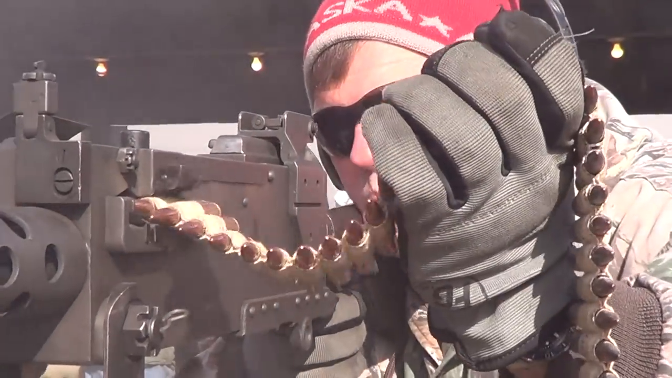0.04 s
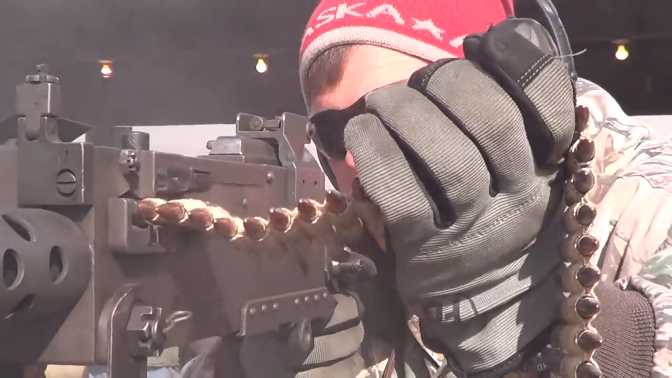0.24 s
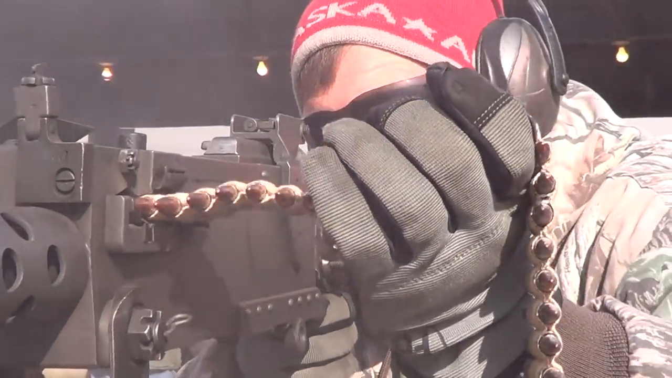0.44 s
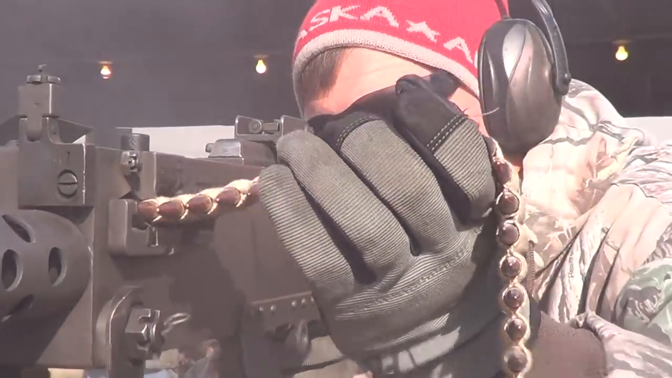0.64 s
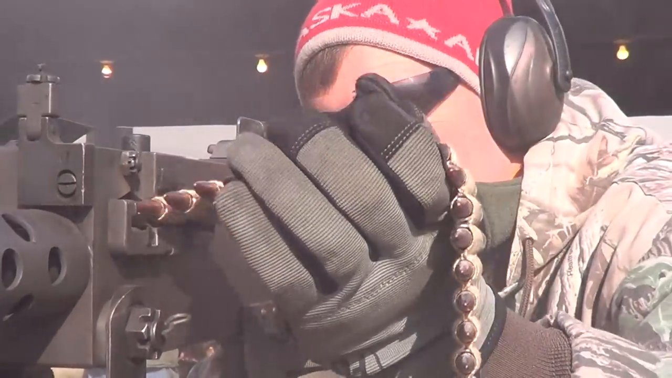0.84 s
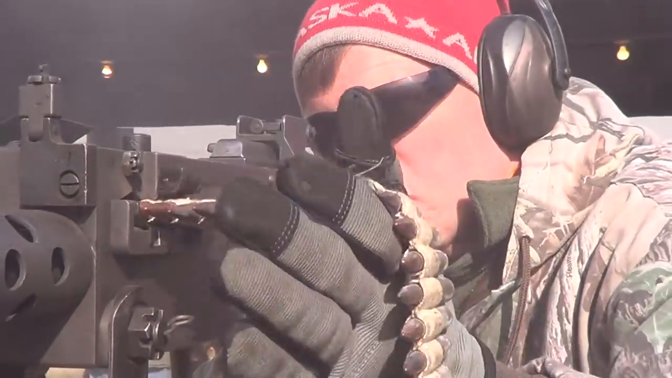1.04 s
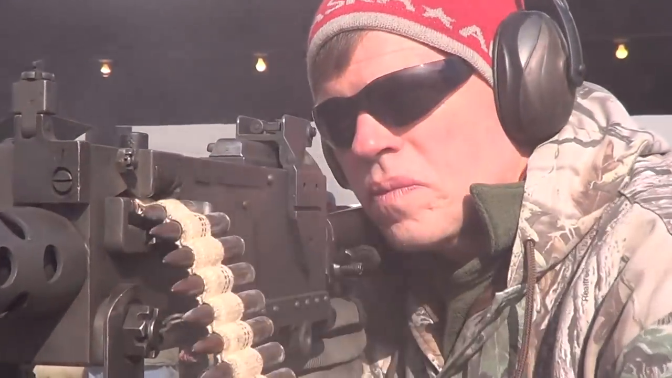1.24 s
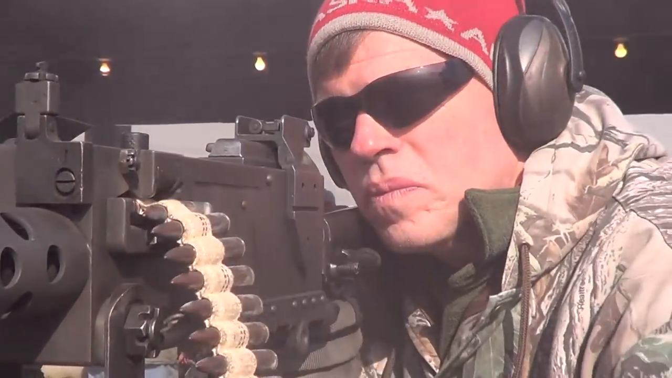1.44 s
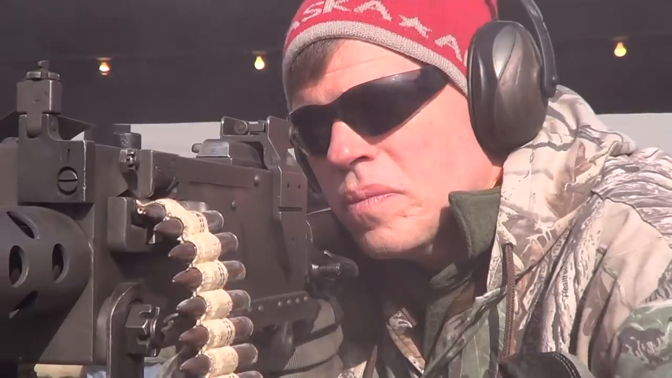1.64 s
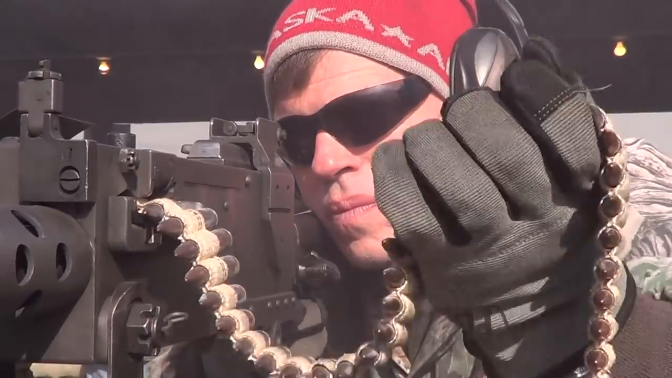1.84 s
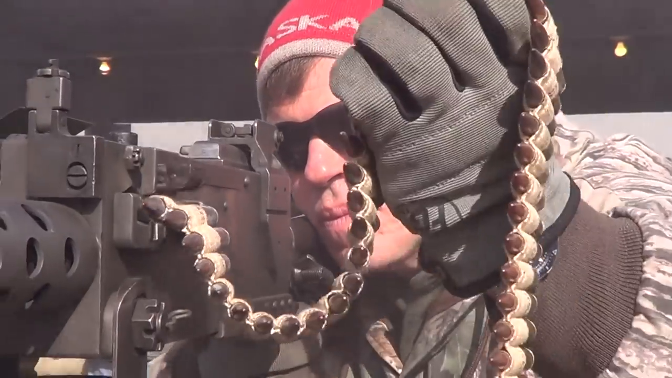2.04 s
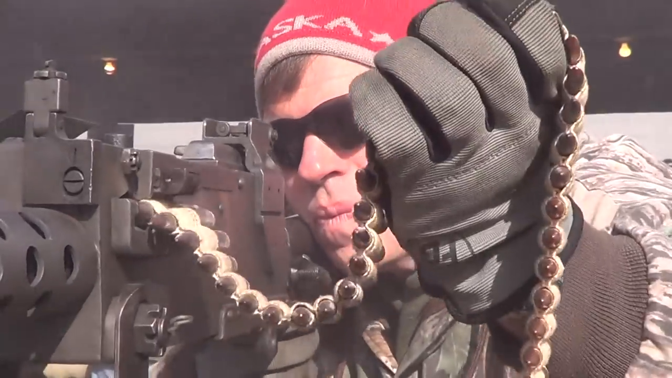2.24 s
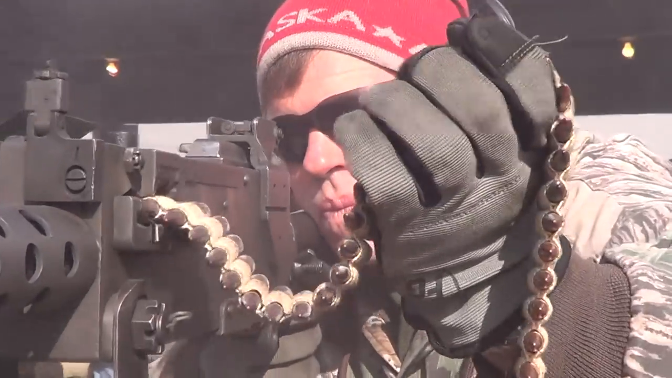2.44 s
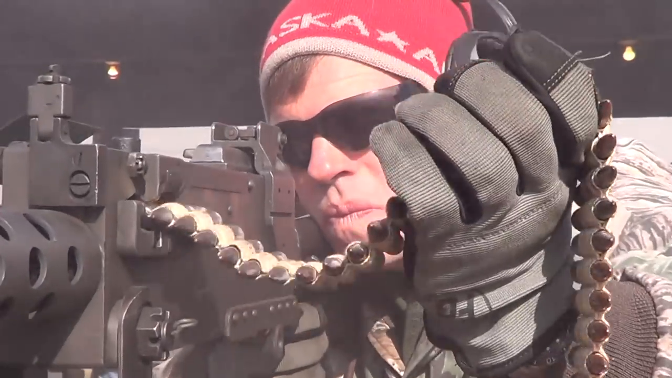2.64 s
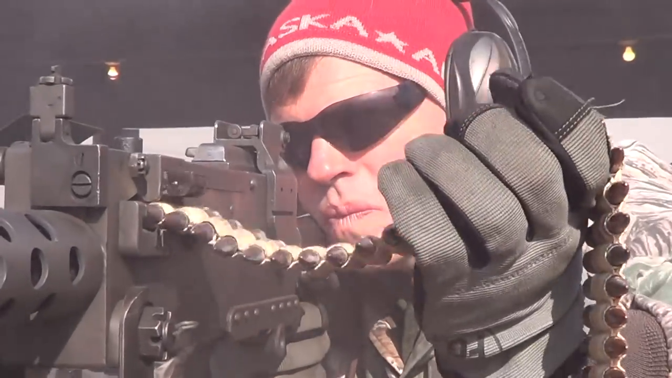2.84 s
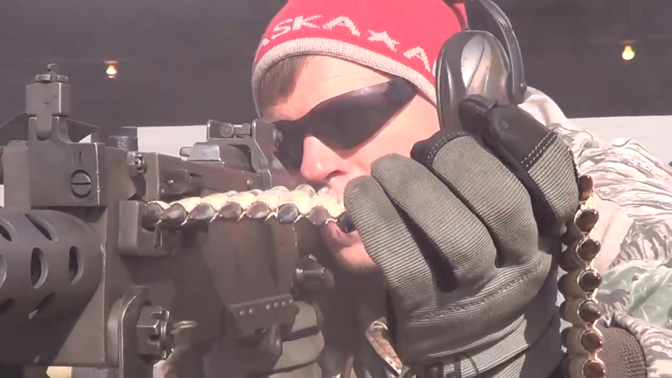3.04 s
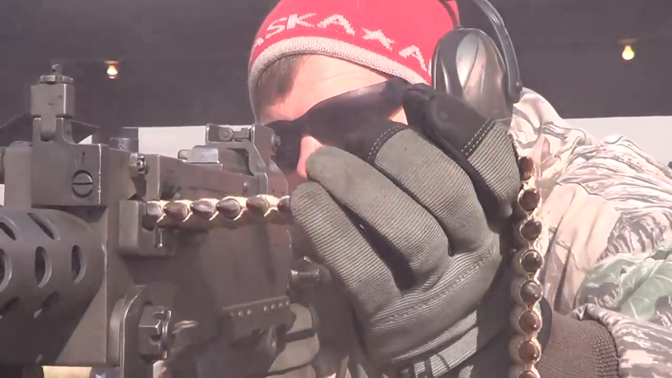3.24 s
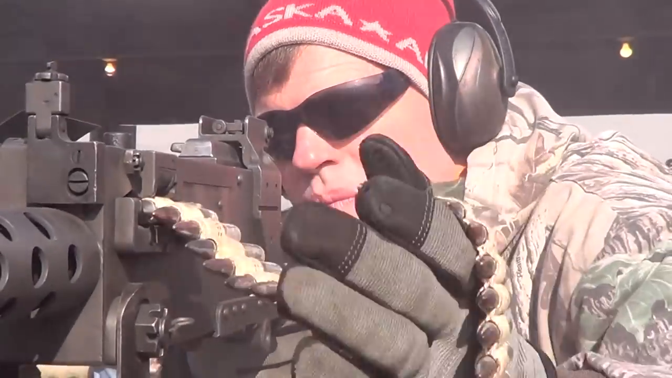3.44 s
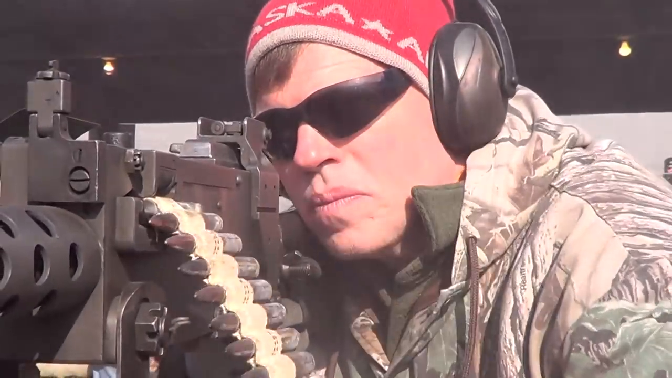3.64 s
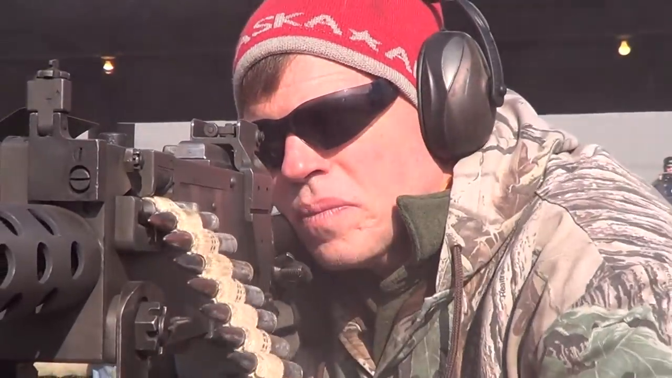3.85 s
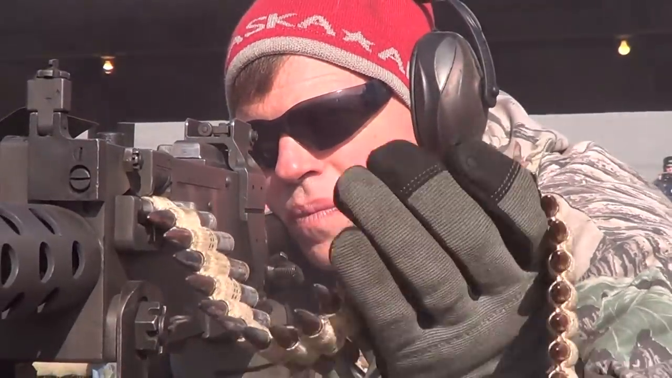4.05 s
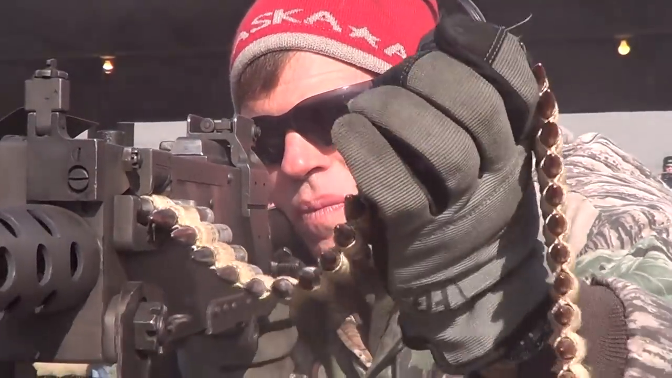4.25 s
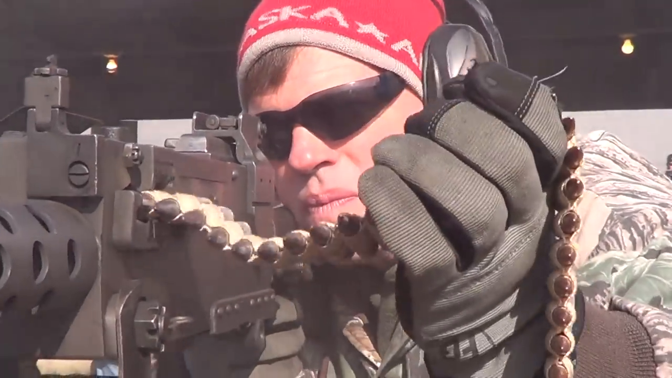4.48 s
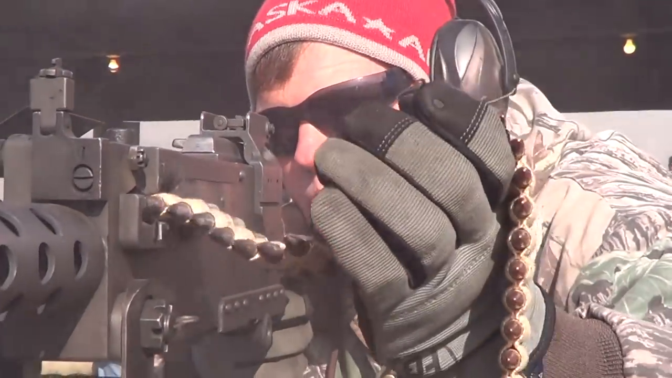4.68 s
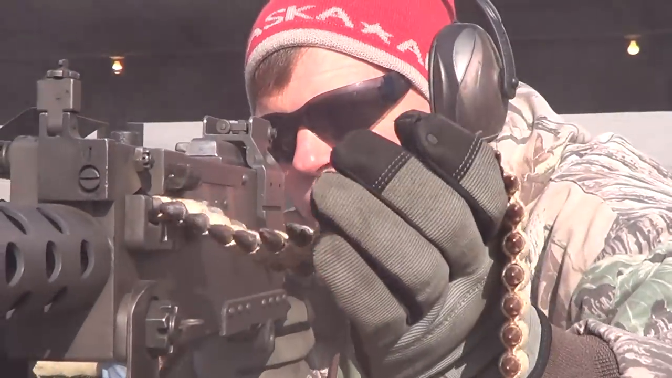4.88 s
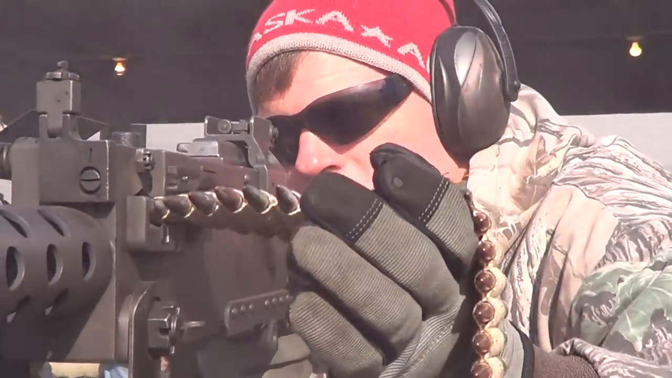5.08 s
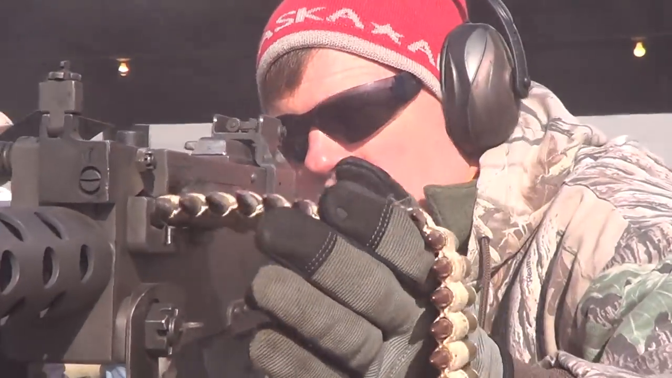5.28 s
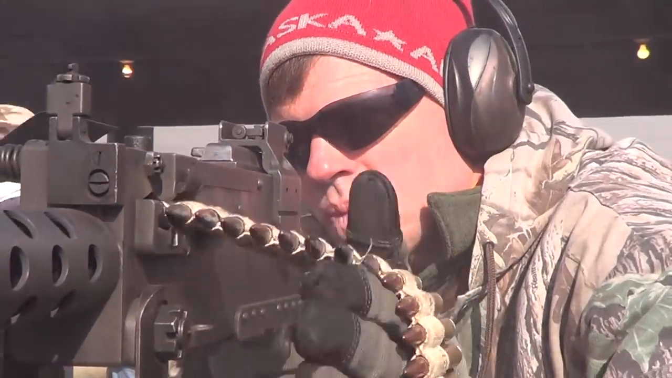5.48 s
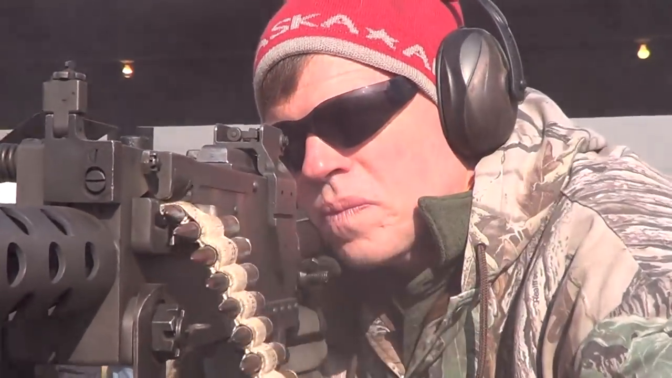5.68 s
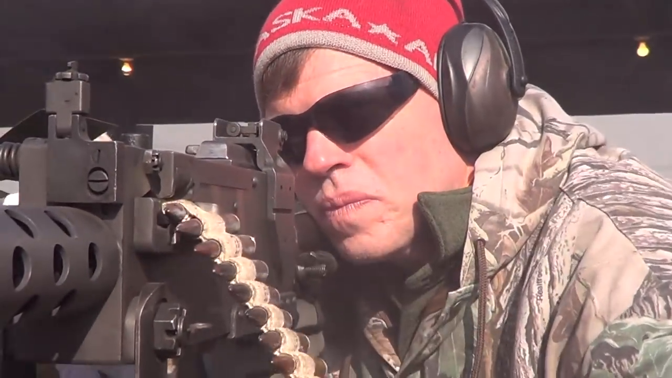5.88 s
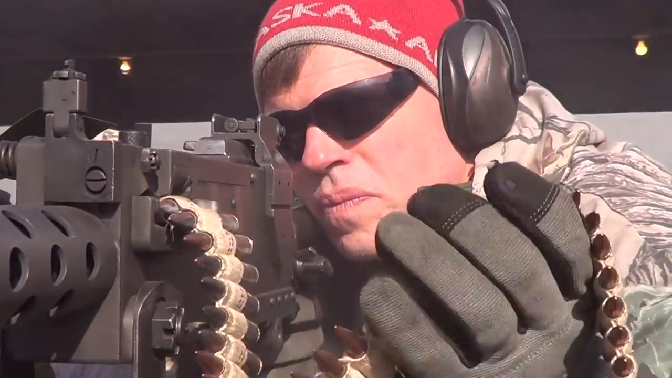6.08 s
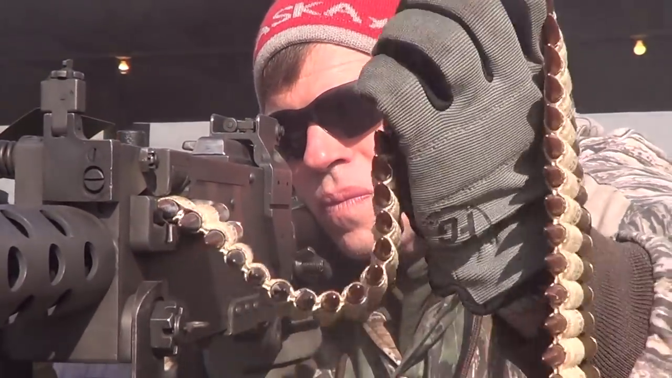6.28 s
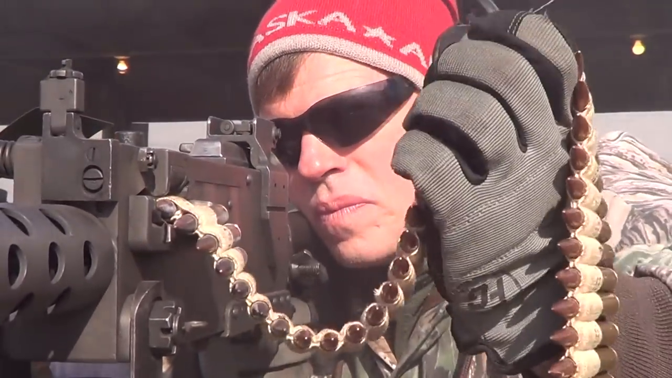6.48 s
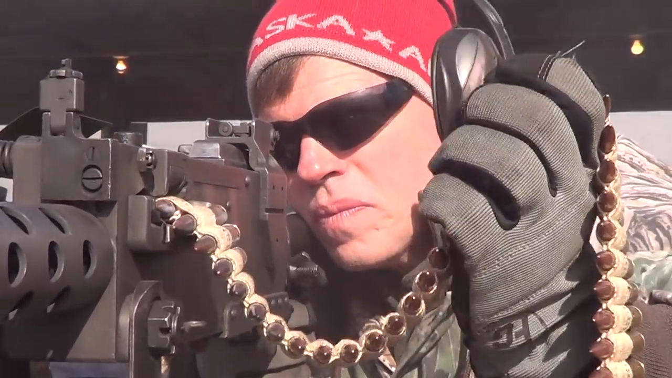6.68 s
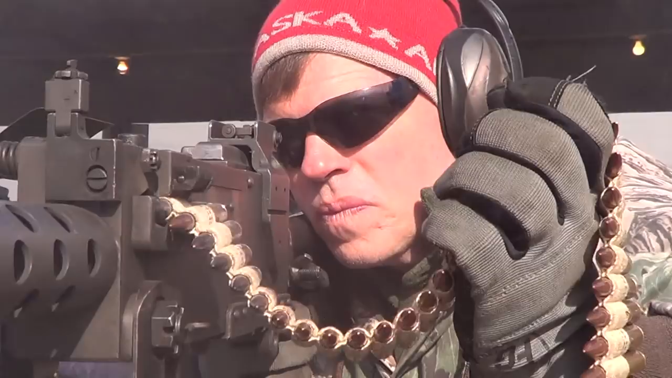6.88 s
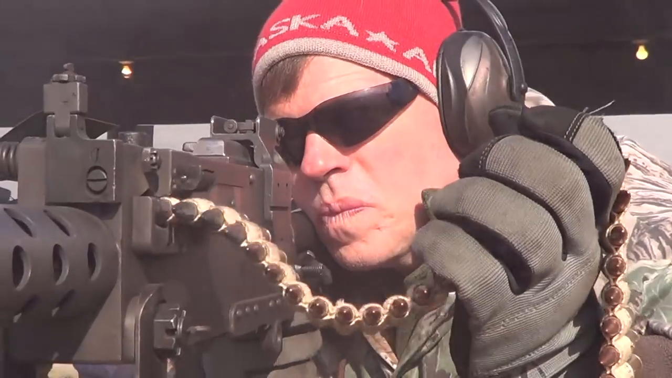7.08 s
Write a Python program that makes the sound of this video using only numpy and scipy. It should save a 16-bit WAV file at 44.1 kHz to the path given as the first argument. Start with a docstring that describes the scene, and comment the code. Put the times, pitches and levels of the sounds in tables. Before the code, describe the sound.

A belt-fed machine gun, already firing, pounds right beside a small microphone under an open shelter at an outdoor range. Three long bursts of about nine rounds per second each end in a bolt clack; a fourth is just starting at the end. In the gaps the echo rolls away, spent brass tinkles, the cartridge belt rattles and slides, and one deeper gun booms in the first gap. Faint distant firing continues.

```python
"""Machine-gun fire is already under way under the roof of an outdoor range: four bursts beside the microphone.
Each blast is a pressure pulse plus noise bands swelling off the shelter; chattering noise and freely ringing
steel modes make the bolt. Between bursts the range echo rolls on in decaying noise bands, the belt rattles
and slides, brass cases ring in damped sines, and a heavier gun booms once. Far shots pop over a steady din."""
import sys
import numpy as np
from scipy import signal
from scipy.fft import rfft, irfft, next_fast_len
from scipy.io import wavfile
from scipy.ndimage import uniform_filter1d

SR = 44100
rng = np.random.default_rng(int(sys.argv[2]) if len(sys.argv) > 2 else 0)


def pcm_store(signal):
    """Save signal as 16-bit PCM."""
    levels = np.round(np.clip(np.atleast_2d(signal), -1, 1) * 32767)
    wavfile.write(sys.argv[1], SR, levels.astype(np.int16).T)


N = 313992


def amp(db):
    """dB to gain."""
    return 10 ** (np.asarray(db) / 20)


def unit(x):
    """Scale to rms 1."""
    return x / np.sqrt(np.mean(x ** 2) + 1e-20)


def clock(seconds):
    """Sample times from zero, in s."""
    return np.arange(int(seconds * SR)) / SR


def add(track, start_s, sound):
    """Mix a sound into the track at start_s; what lies outside the track is dropped."""
    start = round(start_s * SR)
    sound = sound[max(-start, 0):]
    part = track[max(start, 0):][:len(sound)]
    part += sound[:len(part)]


def along(points, hz):
    """Interpolate (Hz, value) points on a log-frequency axis."""
    point_hz, value = np.transpose(points)
    return np.interp(np.log(hz + 1), np.log(point_hz + 1), value)


def filtered(x, response):
    """Multiply the spectrum of x by a response of frequency."""
    n = x.shape[-1]
    padded = next_fast_len(n + 4096)
    spectrum = rfft(x, padded) * response(np.fft.rfftfreq(padded, 1 / SR))
    return irfft(spectrum, padded)[..., :n]


def low_cut(x, corner_hz):
    """Causal second-order high-pass."""
    sos = signal.butter(N=2, Wn=corner_hz, btype="high", fs=SR, output="sos")
    return signal.sosfilt(sos, x)


def resonances(modes, f):
    """One causal band-pass response per (centre_hz, width_hz, level_db) mode."""
    return np.array([amp(db) * 1j * f * width / (centre ** 2 - f ** 2 + 1j * f * width)
                     for centre, width, db in modes])


def hiss(spectrum):
    """Coloured noise of rms 1."""
    return unit(filtered(rng.standard_normal(N), lambda f: amp(along(spectrum, f))))


def smoothed_noise(shape, samples):
    """Slow random variation of rms 1: white noise under a moving average."""
    return unit(uniform_filter1d(rng.standard_normal(shape), size=samples))


def strike(t, rise, t60):
    """A contact's envelope: silent before zero, quick rise, exponential fall."""
    t = np.maximum(t, 0)
    return (1 - np.exp(-t / rise)) * amp(-60 * t / t60)


def bloom(noise, bands, start_db):
    """Scattered sound: each noise band swells from start_db below its level, then dies at its own speed."""
    n = noise.shape[-1]
    t, f = np.arange(n) / SR, np.fft.rfftfreq(n, 1 / SR)
    spectrum = rfft(noise)
    centres, out = np.array(bands)[:, 0], 0
    for (_, db, swell, t60), own in zip(bands, np.eye(len(bands))):
        level_db = db + np.where(t < swell, start_db * (1 - t / swell), -60 * (t - swell) / t60)
        band = irfft(spectrum * along(np.c_[centres, own], f), n)
        out = out + band * amp(level_db)
    return out * np.sqrt(SR / 2)  # white noise to level per Hz


# bursts: first_round_s, round_count, cycle_s, slowing_s_per_round
BURSTS = [(-0.0629, 12, .11052, .00002), (2.0541, 11, .11269, .00042), (4.3086, 12, .1124, .00066),
          (6.7686, 4, .11396, .0034)]
HEAD_START_S = .006  # first cycle of a burst is this much shorter
BLAST_DB, BLAST_SAG_DB = -0.12, 0.1249  # first round; loss per further round


def rounds():
    """Each round's time (s) and place in its burst; the cycle lengthens while the trigger is held."""
    times, places = [], []
    for start, count, cycle, slowing in BURSTS:
        k = np.arange(count)
        lengthening = slowing * k * (k - 1) / 2
        times.append(start + k * cycle + lengthening - HEAD_START_S * (k > 0))
        places.append(k)
    return np.concatenate(times), np.concatenate(places)


# distant din of the firing line: freq_hz, relative_db_per_hz
DIN_SPECTRUM = [(25, -30), (170, -4), (420, 1.5), (950, 1.5), (1800, -11), (4000, -17.5), (10000, -29),
                (16000, -36)]


def din():
    """The distant firing line is steady coloured noise."""
    return amp(-45.0) * hiss(DIN_SPECTRUM)


# shots from far lanes: start_s, level_db
FAR_SHOTS = [(1.098, -19.5), (1.538, -40), (1.573, -28), (1.657, -28.5)]
# a far shot's dull pop: freq_hz, relative_db_per_hz
POP_SPECTRUM = [(40, -27), (300, -18), (750, -7), (1600, 1), (3000, -10), (16000, -35)]


def far_lanes():
    """Other shooters' rounds arrive as dull pops: short bursts of coloured noise."""
    t, level = clock(.15), np.zeros(N)
    for start_s, db in FAR_SHOTS:
        add(level, start_s, amp(db) * strike(t, rise=0.0018, t60=0.052))
    return level * hiss(POP_SPECTRUM)


# range's long answer to one round: centre_hz, level_db_per_hz, swell_s, t60_s
RANGE_BANDS = [(30.14, -113, .1, 1.8), (170, -78, 0.145, 3.3), (440, -68, 0.065, 3.35),
               (950, -68.5, 0.081, 3), (2020, -72.5, 0.14, 2.95), (4500, -76.5, 0.046, 2.22),
               (9226, -79, 0.017, 1.5), (16014, -101, .05, 1.1)]


def range_echo():
    """Berms and trees return every round as a long roll; the rolls add in power."""
    slow_t = np.linspace(0, N / SR, num=1500)
    fired, place = rounds()
    shot_power = amp(BLAST_DB - BLAST_SAG_DB * place) ** 2
    padded = next_fast_len(N)
    t, f = np.arange(N) / SR, np.fft.rfftfreq(padded, 1 / SR)
    white = rfft(rng.standard_normal(padded))
    centres, out = np.array(RANGE_BANDS)[:, 0], 0
    for (_, db, swell, t60), own in zip(RANGE_BANDS, np.eye(len(RANGE_BANDS))):
        power = shot_power @ strike(slow_t - fired[:, None], swell / 2, t60) ** 2
        # uneven ground makes the roll lumpy
        lumps_db = 1.05 * smoothed_noise(len(slow_t), samples=6)
        band = irfft(white * along(np.c_[centres, own], f), padded)[:N]
        out = out + np.interp(t, slow_t, amp(db + lumps_db) * np.sqrt(power)) * band
    return out * np.sqrt(SR / 2)


# heavier gun's low boom under the roof: pitch_hz, level_db, t60_s
HEAVY_BOOM = [(62, -27, 0.04), (135, -20, .05), (348, -20, 0.18), (770, -20.5, 0.12)]
# heavier gun's report: centre_hz, level_db_per_hz, swell_s, t60_s
HEAVY_REPORT = [(30, -71, .003, .06), (80, -64, .004, 0.08), (150, -56.5, .005, 0.22),
                (350, -54, 0.013, 0.33), (820, -55, .006, 0.36), (1600, -62, 0.013, 0.35),
                (5000, -65.5, .004, 0.41), (16000, -78, .004, .2)]
# heavier gun's roll over the range: centre_hz, level_db_per_hz, swell_s, t60_s
HEAVY_ROLL = [(30, -91, .07, 1), (150, -74.5, .07, 3), (400, -65.5, .15, 2.4), (900, -70, 0.14, 3.8),
              (2000, -76.5, 0.28, 3), (5000, -82.5, 0.17, 2.1), (16000, -104, .1, .8)]


def heavy_gun():
    """One deep report from down the firing line: damped sines boom, noise bands crack and roll."""
    t, out = clock(0.73), np.zeros(N)
    boom = sum(amp(db) * strike(t, rise=0.0058, t60=t60) * np.sin(2 * np.pi * hz * t)
               for hz, db, t60 in HEAVY_BOOM)
    report = bloom(rng.standard_normal(len(t)), HEAVY_REPORT, start_db=-0.5)
    roll = bloom(rng.standard_normal(len(t)), HEAVY_ROLL, start_db=-13)
    add(out, 1.3835, boom + report + roll)
    return out


# modes of a brass case: pitch_hz, relative_db, t60_s
BRASS_MODES = [(7970, -2.5, 0.18), (8240, -3, 0.1), (10160, -1, 0.16), (10800, -9, 0.47), (11370, 4, 0.12),
               (11620, -7, 0.21), (11710, -19, .25), (15900, -12, .18), (15450, -14, .25)]


def chime(t, decays, tick_db, scatter):
    """A brass tube struck at a random spot: a tick and close mode pairs, a little different for each case."""
    hz, db, _ = np.transpose(BRASS_MODES)
    pitch_hz = hz * (1 + scatter * rng.standard_normal(len(hz)))
    gains = amp(db + rng.normal(0, 3.2, len(hz)))
    ring = gains @ (decays * np.sin(2 * np.pi * np.outer(pitch_hz, t)))
    tick = np.diff(rng.standard_normal(len(t) + 1)) * amp(-60 * t / .016)
    return ring + amp(tick_db) * tick


# spent cases that land hardest: start_s, relative_db
CASES = [(1.325, -25.5), (1.454, -25), (1.676, -29.5), (1.834, -24.5), (1.972, -32), (3.605, -27),
         (3.743, -27), (3.832, -24), (4.075, -32), (4.213, -40), (5.898, -31.5), (5.965, -27), (6.163, -32),
         (6.282, -26), (6.556, -32.5)]
# every round's case also tumbles softly: earliest and latest delay after firing, level and its scatter
TUMBLE_S, TUMBLE_DB, TUMBLE_SCATTER_DB = (.6, 1.15), -46, 2.5


def brass():
    """Cases land on the heap, ring and jostle their neighbours."""
    t, out = clock(.25), np.zeros(N)
    decays = np.array([amp(-60 * t / t60) for _, _, t60 in BRASS_MODES])
    for start_s, db in CASES:
        add(out, start_s, amp(db - 11.0) * chime(t, decays, tick_db=-6, scatter=.009))
        for delay_s in rng.uniform(0.0017, .04, size=2):
            neighbour = chime(t, decays, tick_db=-12, scatter=0.015)
            add(out, start_s + delay_s, amp(db - 20.0) * neighbour)
    for fired_s in rounds()[0]:
        db = TUMBLE_DB + TUMBLE_SCATTER_DB * rng.standard_normal()
        landing_s = fired_s + rng.uniform(*TUMBLE_S)
        add(out, landing_s, amp(db) * chime(t, decays, tick_db=-9, scatter=.012))
    return out


# modes of the steel receiver: centre_hz, width_hz, relative_db
RECEIVER_MODES = [(2150, 240, -2.5), (3412, 85, 3.5), (3780, 106, 4.5), (4200, 240, -1), (4990, 210, 5),
                  (6640, 230, 7), (7670, 300, 2), (8340, 340, 4), (9260, 160, 5), (9950, 310, 5.5),
                  (11200, 370, -7.5), (13950, 350, -9), (15700, 250, -8)]
# dry metal contact: freq_hz, relative_db_per_hz
CONTACT_SPECTRUM = [(25, -21), (200, -14), (600, -4.5), (2000, -10.5), (4000, -4.5), (9500, -1.5),
                    (12500, -10), (17000, -19)]


def steel(dry_db, grain_db):
    """Chattering contacts ring the receiver, mixed with dry contact noise; rms 1."""
    grain = amp(grain_db * smoothed_noise(N, samples=70))
    grid_hz = np.fft.rfftfreq(4096, 1 / SR)
    # neighbouring modes swing in opposite directions
    signs = (-1) ** np.arange(len(RECEIVER_MODES))
    body = abs(signs @ resonances(RECEIVER_MODES, grid_hz))
    ring = filtered(grain * rng.standard_normal(N), lambda f: np.interp(f, grid_hz, body))
    dry_contact = unit(grain * hiss(CONTACT_SPECTRUM))
    return unit(unit(ring) + amp(dry_db) * dry_contact)


# belt and feed tray rattles: start_s, relative_db, hollow_re_bright_db, t60_s
RATTLES = [(1.32, -20, 4.5, .045), (1.552, -22.5, -19, 0.054), (1.729, -22.5, -17, .086),
           (3.436, -27, 4.5, 0.05), (3.603, -27.5, -17, .07), (3.826, -35, -14, 0.05),
           (4.025, -20, -11.5, 0.13), (6.045, -34, -10, .058), (6.478, -30.5, -13, 0.039)]
# belt slides through the glove after each burst: start_s, length_s, level_db
SLIDES = [(1.55, .42, -51.5), (3.46, 0.55, -49.5), (5.917, 0.25, -43.5), (6.51, 0.3, -54)]
# hollow knock in the tray: freq_hz, relative_db_per_hz
TRAY_SPECTRUM = [(30, -22), (500, -8), (1600, 0), (3000, 3.5), (6000, -14), (17000, -38)]
LINK_CLICKS_PER_S, LINK_DB, LINK_T60_S = 22, 12, .035  # level over the sliding, before random force


def belt():
    """Cartridges knock against the feed tray and click against each other as the belt slides."""
    t = clock(.2)
    bright, hollow, sliding = np.zeros((3, N))
    for start_s, db, hollow_db, t60 in RATTLES:
        knock = amp(db - 2) * strike(t, rise=t60 / 50, t60=t60)
        add(bright, start_s, knock)
        add(hollow, start_s, amp(hollow_db) * knock)
    for start_s, length_s, db in SLIDES:
        add(sliding, start_s, amp(db) * np.sqrt(np.hanning(int(length_s * SR))))
        count = round(LINK_CLICKS_PER_S * length_s)
        click = amp(db + LINK_DB) * strike(t, rise=.0005, t60=LINK_T60_S)
        for k, (slip, force) in enumerate(rng.random((count, 2))):
            add(bright, start_s + length_s * (k + slip) / count, force * click)
    knocks = bright * steel(dry_db=9, grain_db=1.5) + hollow * hiss(TRAY_SPECTRUM)
    return knocks + sliding * steel(dry_db=11, grain_db=5)


# a clack's free ring: level re contact, scatter of each mode, share of the receiver's damping
RING_DB, RING_SCATTER_DB, RING_DAMPING = 0, 4.5, .5


def clack(t):
    """One hard steel contact: the receiver's modes ring freely, in a new balance each time."""
    hz, width_hz, db = np.transpose(RECEIVER_MODES)
    gains = amp(db + RING_SCATTER_DB * rng.standard_normal(len(hz)))
    pitch_hz = hz * rng.normal(1, 0.004, len(hz))
    phase = 2 * np.pi * (np.outer(pitch_hz, t) + rng.random((len(hz), 1)))
    decays = np.exp(-np.pi * RING_DAMPING * np.outer(width_hz, t))
    ring = gains @ (np.sin(phase) * decays)
    return ring / np.linalg.norm(gains) * (1 - np.exp(-t / .0005))


# bolt strikes the belt pawl, then locks: lead_before_round_s, relative_db
CLACKS = [(.0138, -15), (.005, -20)]
# bolt closes on a round that stays unfired: start_s, relative_db, length_s
STOPS = [(1.247, -11, 0.023), (3.294, -10.5, 0.02), (5.686, -15, .026)]
# bolt hits its buffer, more softly as the gun slows: delay after blast, mean first level, loss per round
BUFFER_S, BUFFER_DB, BUFFER_SAG_DB = .038, -13.5, 2
# bolt runs forward: lead before the round, level, loss per round
FEED_LEAD_S, FEED_DB, FEED_SAG_DB = 0.032, -0.5, 0.41


def action():
    """The bolt hits its buffer after each blast, then scrapes forward, pulls the belt and locks."""
    t = clock(.15)
    back, forward, ring = np.zeros((3, N))
    # the scrape gathers as the bolt picks up speed
    run_up = (1 - np.exp(-(t / 0.021) ** 3.27)) * amp(-60 * t / 0.079)
    fired, place = rounds()
    contacts = []
    for fired_s, k, (hit, pull, drag) in zip(fired, place, rng.standard_normal((len(fired), 3))):
        hit_db = BUFFER_DB - BUFFER_SAG_DB * k + 2.3 * hit
        add(back, fired_s + BUFFER_S, amp(hit_db) * strike(t, rise=0.0065, t60=0.075))
        if k > 0:
            force_db = .7 * pull - FEED_SAG_DB * k
            add(forward, fired_s - FEED_LEAD_S, amp(FEED_DB + force_db) * run_up)
            contacts += [(fired_s - lead_s + .0008 * drag, db + force_db) for lead_s, db in CLACKS]
    for start_s, db, length_s in STOPS:
        add(forward, start_s, amp(db - 3.5) * strike(t, rise=0.0094, t60=0.12))
        contacts += [(start_s + length_s / 3, db - 11), (start_s + length_s, db - 2)]
    for contact_s, db in contacts:
        add(forward, contact_s, amp(db - 2.5) * strike(t, rise=.0013, t60=0.029))
        add(ring, contact_s, amp(db + RING_DB) * clack(t))
    return back * steel(dry_db=2, grain_db=3.5) + forward * steel(dry_db=-5.5, grain_db=0.5) + ring


def push(t, time_constant_s):
    """The muzzle's pressure push and equal suction."""
    u = np.maximum(t, 0) / time_constant_s
    return 2 * u * (2 - u) * np.exp(-u)


# pulse returns from ground, roof and walls: delay_s, relative_db, pulse_time_constant_s
WALLS = [(0.019, -21.5, 0.00024), (0.0215, -25.5, .0004), (.0336, -18, 0.00043), (0.042, -30.5, 0.00054),
         (.0575, -25.5, .0005), (.064, -21.5, 0.00055), (.0745, -28, 0.00041)]


def pressure_returns(t):
    """The pressure pulse comes back from each large surface."""
    return sum(amp(db) * push(t - delay_s, pulse_s) for delay_s, db, pulse_s in WALLS)


# blast under the roof: centre_hz, relative_db_per_hz, swell_s, t60_s
BLAST_BANDS = [(25, -112, .006, .3), (85, -100, .006, 0.27), (141, -69, 0.047, 0.53),
               (302, -65.5, 0.026, 0.67), (606, -55.5, 0.027, 0.15), (1160, -55, 0.02, 0.19),
               (2250, -54.5, 0.011, 0.35), (4660, -52.5, 0.01, 0.19), (8570, -49, 0.0082, 0.19),
               (12040, -55, 0.0044, 0.16), (17100, -59.5, 0.0028, 0.085)]
# air resonances of the shelter: centre_hz, width_hz, relative_db
SHELTER_MODES = [(134.2, 21, -2.5), (180, 8.8, -2), (385, 33, -2), (584, 23, -7.5), (756, 32, -2),
                 (873, 19, 0), (1228, 25.7, -7.5)]
PUSH_DB, PUSH_S = -34, 0.00091  # straight from the muzzle: relative level, time constant


def blasts():
    """Each muzzle blast scatters under the roof; long waves repeat their paths, short ones scatter anew."""
    t = clock(.32)
    fired, place = rounds()

    def shared_power(f):
        return np.clip(along([(150, 0.76), (600, 0.35), (1500, 0.13), (5000, 0.045)], f), 0, 1)

    shared = filtered(rng.standard_normal(len(t)), lambda f: np.sqrt(shared_power(f)))
    anew = filtered(rng.standard_normal((len(fired), len(t))), lambda f: np.sqrt(1 - shared_power(f)))
    noise = shared + anew
    # reflections arrive in clumps, so the swell crackles
    clumps = unit(amp(1.4 * smoothed_noise(noise.shape, samples=90)))
    front = 1 - np.exp(-t / 0.0002)
    scattered = front * bloom(noise * clumps, BLAST_BANDS, start_db=-3.5)
    # the walls are too small to return the longest waves
    reports = scattered + low_cut(pressure_returns(t), corner_hz=173)
    direct = amp(PUSH_DB) * push(t, PUSH_S)
    out = np.zeros(N)
    for fired_s, k, report in zip(fired, place, reports):
        add(out, fired_s, amp(BLAST_DB - BLAST_SAG_DB * k) * (report + direct))
    return filtered(out, lambda f: 1 + resonances(SHELTER_MODES, f).sum(0))


def scene():
    """Sum the surroundings and the near gun into one channel."""
    surroundings = din() + far_lanes() + range_echo() + heavy_gun()
    gun = brass() + belt() + action() + blasts()
    return (surroundings + gun)[None]


TOP_HZ = 17400


def record(dry):
    """The small microphone loses the deepest bass; the recorder rounds off peaks and is band-limited."""
    ceiling = .75  # full scale = 1
    x = low_cut(dry, corner_hz=42)
    rounded = x / (1 + (x / ceiling) ** 4) ** (1 / 4)
    return filtered(rounded, lambda f: f < TOP_HZ)


dry = scene()
out = record(dry)
pcm_store(out)
```